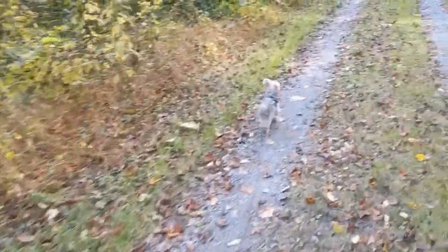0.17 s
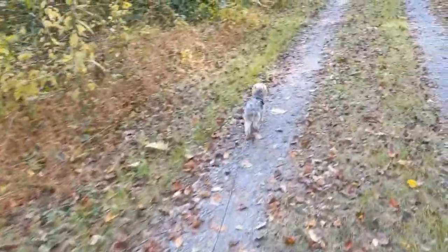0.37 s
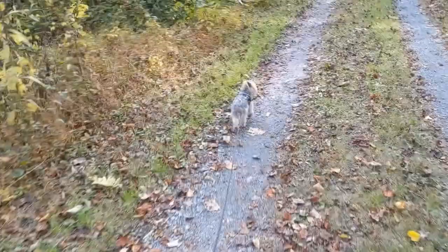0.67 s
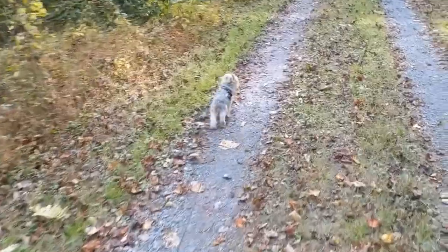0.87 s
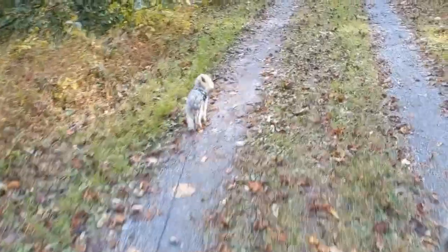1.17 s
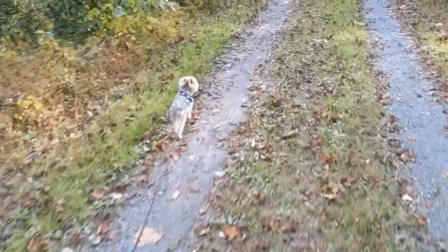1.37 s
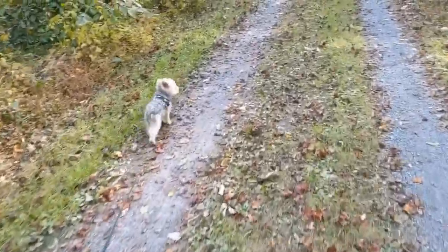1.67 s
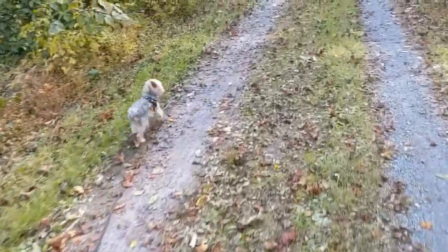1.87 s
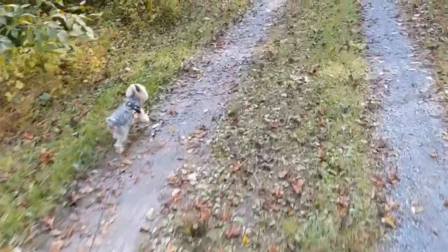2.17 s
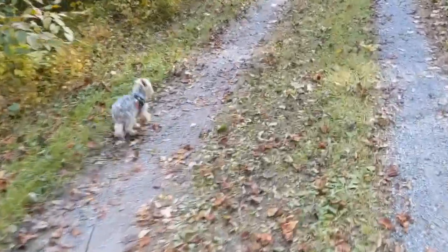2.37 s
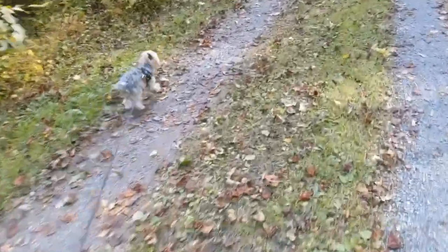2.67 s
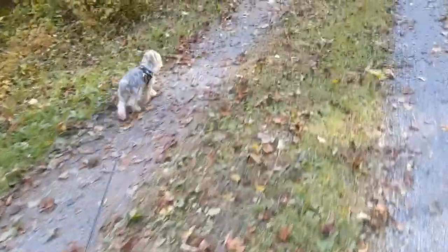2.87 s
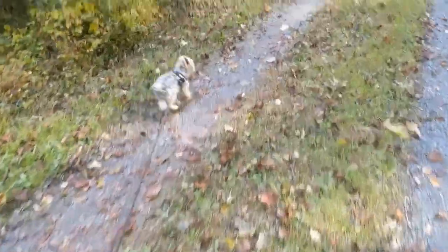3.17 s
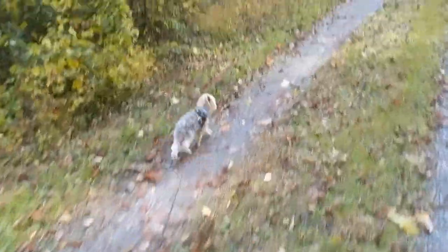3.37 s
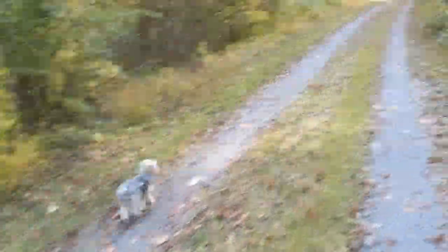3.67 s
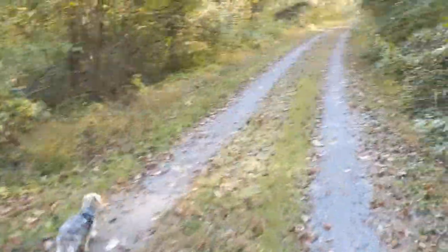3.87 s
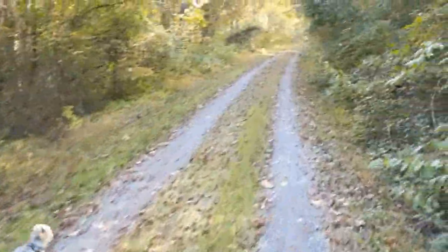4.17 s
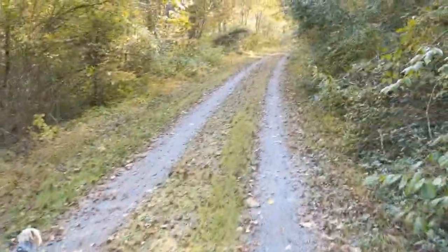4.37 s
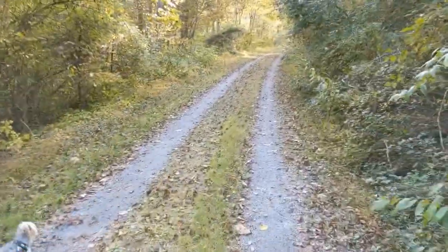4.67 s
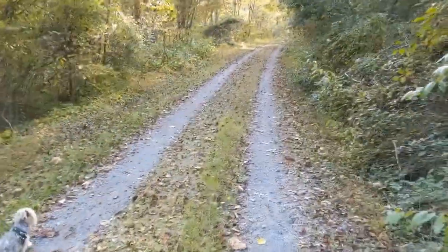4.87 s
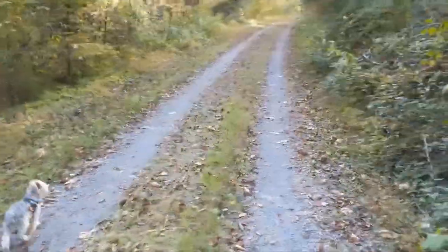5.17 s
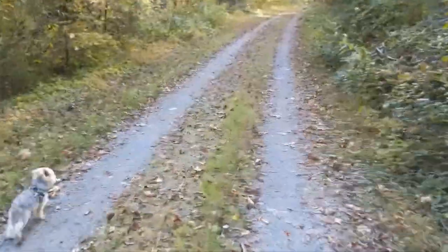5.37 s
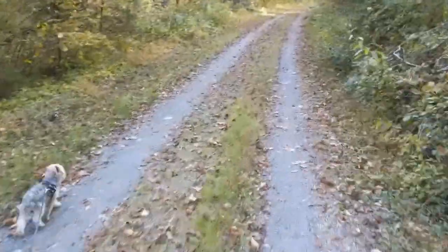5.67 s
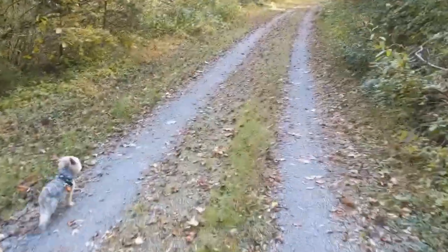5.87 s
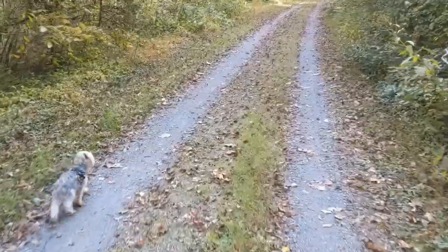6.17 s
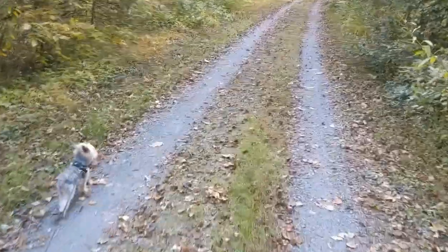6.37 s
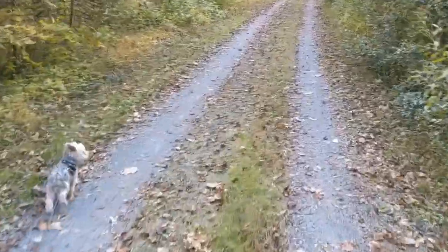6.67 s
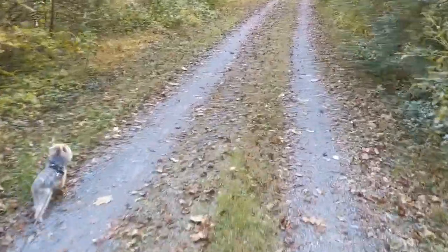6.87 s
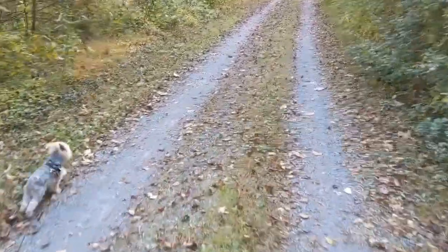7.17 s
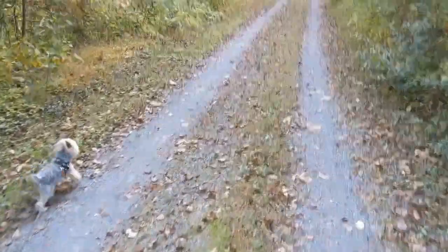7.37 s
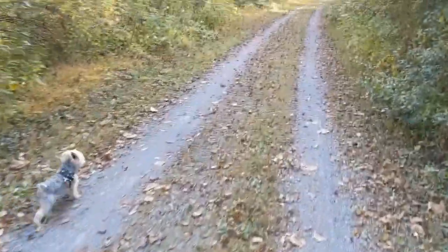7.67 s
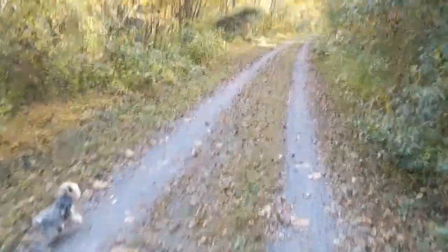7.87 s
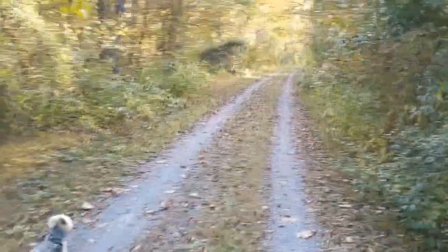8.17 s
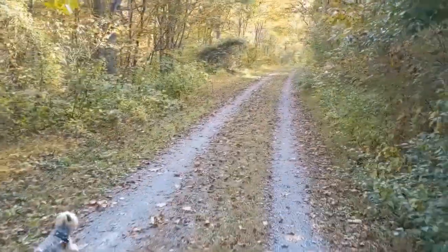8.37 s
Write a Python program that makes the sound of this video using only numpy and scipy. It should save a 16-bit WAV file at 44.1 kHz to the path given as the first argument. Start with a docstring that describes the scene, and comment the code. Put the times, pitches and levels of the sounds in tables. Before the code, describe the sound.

Bicycle tyres roll slowly through dry leaves, hissing and crackling, then crunch over gritty gravel with popping pebbles before rustling through a deeper leaf drift.

```python
"""Woodland gravel track, from a slowly rolling bicycle; stereo microphone, the tyres close by and to the left.
First thin dry leaves hiss in swishes, shaped bursts of crackling noise, with bright ticks as stalks snap.
From about 2.7 s grit crunches as noise in coarser bursts, small stones tick and single pebbles pop from the rubber.
From about 5.7 s a deeper drift of leaves hisses, and towards the end more pebbles pop, some with a bright tip.
Throughout, noise bands make the tyres' drone, the faint hub whine and air on the microphone; bumps thud."""
import sys
import numpy as np
from scipy import signal
from scipy.fft import rfft, irfft, next_fast_len
from scipy.io import wavfile
from scipy.ndimage import uniform_filter1d, map_coordinates

SR = 44100
rng = np.random.default_rng(int(sys.argv[2]) if len(sys.argv) > 2 else 0)


def to_wav(s):
    """Save 16-bit WAV."""
    ch = np.atleast_2d(s).T  # columns
    pcm = np.round(np.clip(ch, -1, 1) * 32767)  # PCM
    wavfile.write(sys.argv[1], SR, pcm.astype(np.int16))


N = 376305


def amp(db):
    """Decibels to gain."""
    return 10 ** (np.asarray(db) / 20)


def unit(pair):
    """Scale a stereo pair so that its centre has rms 1."""
    centre = pair.mean(0)
    return pair / np.sqrt(np.mean(centre ** 2) + 1e-20)


def along(points, hz):
    """Read (Hz, value) points on a logarithmic frequency axis."""
    f, values = np.transpose(points)
    return np.interp(np.log(hz + 1), np.log(f + 1), values)


def curves(rows):
    """One value per sample for each column after the time."""
    times, *columns = np.transpose(rows)
    t = np.arange(N) / SR
    return [np.interp(t, times, column) for column in columns]


def wobble(rate):
    """A smooth random curve with rate knots a second."""
    knots = rng.standard_normal(int(N * rate / SR) + 4)
    return map_coordinates(knots, [np.arange(N) * rate / SR])


def filtered(x, response):
    """Multiply the spectrum of x by a response of frequency."""
    size = next_fast_len(N + SR // 2)
    hz = np.fft.rfftfreq(size, 1 / SR)
    return irfft(rfft(x, size) * response(hz), size)[..., :N]


def resonant(modes, hz):
    """Gain of a few resonant humps, their decibels added."""
    return amp(sum(db / (1 + (2 * (hz - centre) / width) ** 2) for centre, width, db in modes))


def sides(balance, hz):
    """Left and right gains whose mean is 1."""
    ratio = amp(along(balance, hz))
    return 2 * np.array([ratio, np.ones_like(ratio)]) / (1 + ratio)


def add(track, s, sound):
    """Mix a sound into a track at s seconds."""
    start = max(round(s * SR), 0)
    room = track[..., start:start + sound.shape[-1]]
    room += sound[..., :room.shape[-1]]


# likeness of the two microphone channels: f/Hz, likeness (0 unrelated, 1 the same)
LIKENESS = [(30, 0.91), (130, 0.7), (500, 0.37), (1200, 0.48), (2500, 0.075), (5000, 0.028), (12000, 0.1)]


def placed(pair, spectrum, balance):
    """Colour two unrelated signals and blend them into left and right, at rms 1."""
    def mid_side(hz):
        turn = np.arccos(np.clip(along(LIKENESS, hz), -1, 1)) / 2
        return amp(along(spectrum, hz)) * np.array([np.cos(turn), np.sin(turn)])

    mid, side = filtered(pair, mid_side)
    left_right = np.array([mid + side, mid - side])
    return unit(filtered(left_right, lambda hz: sides(balance, hz)))


def patchy(pair, depth_db):
    """Each leaf or patch of ground has its own colour: random gains over some 400 Hz and 40 ms."""
    z = signal.stft(pair, nperseg=512)[2]
    field = rng.standard_normal(z.shape[1:])
    field = uniform_filter1d(field, size=5, axis=0)
    field = uniform_filter1d(field, size=7, axis=1)
    coloured = z * amp(depth_db * field / field.std())
    return unit(signal.istft(coloured, nperseg=512)[1][:, :N])


def fractures(rate, spread_db, life):
    """Energy, of mean 1, of short bursts of scattered size that start at once and die away."""
    chance, size = rng.random(N), rng.standard_normal(N)
    energy = (chance < rate / SR) * amp(spread_db * np.minimum(size, 1.8)) ** 2
    energy = signal.lfilter([1], [1, -np.exp(-2 / (life * SR))], energy)
    return energy / energy.mean()


def crackle(rate, spread_db, life, smooth_db):
    """Two noises made of tiny fractures over a smooth rub."""
    envelope = np.sqrt(fractures(rate, spread_db, life) + amp(smooth_db) ** 2)
    return envelope * rng.standard_normal((2, N))


def narrow(hz, width_hz):
    """A narrow band of noise around a pitch: a carrier with randomly fluttering strength and phase."""
    flutter = wobble(width_hz) + 1j * wobble(width_hz)
    phase = 2 * np.pi * np.cumsum(hz * np.ones(N)) / SR
    return np.real(flutter * np.exp(1j * phase))


def pop(t, hz, cycles):
    """A pitched pulse, as of a stone squeezed out by soft rubber: a quick swell that dies in a few cycles."""
    turns = t * hz
    swell = turns / (np.maximum(cycles, .5) / 2)  # reaches 1 at the loudest moment
    return swell ** 2 * np.exp(2 * (1 - swell)) * np.sin(2 * np.pi * turns)


# headwind at the microphone: t/s, level/dB before trim
WIND = [(0.0, -60.5), (0.4, -63.5), (0.97, -61.5), (1.31, -56), (1.95, -60.5), (2.4, -61), (2.8, -56.5),
        (3.47, -62.5), (4.06, -56), (4.49, -64.5), (6.06, -57), (6.6, -60.5), (6.96, -58), (7.93, -60.5),
        (8.1, -64), (8.53, -62)]
# colour of the buffeting: f/Hz, relative level/dB
BUFFET = [(7.1, -30), (12, 7), (30, -0.5), (76, -10.5), (160, -17), (210, -76), (350, -120)]
# stereo balance of track and bicycle: f/Hz, left minus right level/dB
TRACK_SIDE = [(50, 3.3), (300, 2.6), (1000, 5.3), (2200, 11.1), (3200, 9.1), (4500, 2.6), (8000, 6.2)]
WIND_TRIM_DB = 5


def air():
    """The headwind buffets the microphone in soft lumps: low noise with a wavering level."""
    wind_db, = curves(WIND)
    buffet = placed(rng.standard_normal((2, N)), BUFFET, TRACK_SIDE)
    return amp(wind_db + WIND_TRIM_DB + 2.0 * wobble(9)) * buffet


# hub whine, following the riding speed: t/s, pitch f/Hz, level/dB before trim
HUB = [(0, 4050, -64), (1.5, 4080, -69), (1.75, 4090, -60), (2.0, 4060, -66), (2.7, 4030, -63),
       (3.3, 4200, -68), (3.8, 4140, -70), (4.0, 4100, -60.5), (4.4, 4020, -73), (4.9, 4230, -77),
       (5.3, 4190, -65), (5.7, 4500, -67), (6.4, 4160, -67), (6.9, 4060, -64), (7.3, 4200, -67),
       (7.6, 4260, -62), (8.0, 4040, -67), (8.53, 3970, -78)]
HUB_TRIM_DB, HUB_WAVER_DB = 1.5, 2


def hub():
    """A thin, hissy whine from the turning hub, a narrow noise band coming and going."""
    hz, db = curves(HUB)
    level = amp(db + HUB_TRIM_DB + HUB_WAVER_DB * wobble(14))
    return level * narrow(hz, width_hz=240) * sides(TRACK_SIDE, hz)


# tyre drone: t/s, level/dB before trim
ROLL = [(0.0, -67.5), (0.38, -63.5), (0.57, -72), (0.81, -63), (0.95, -66.5), (1.92, -64), (2.63, -62.5),
        (2.78, -62), (4.11, -61.5), (4.92, -59.5), (5.3, -62.5), (6.15, -60.5), (6.56, -61.5), (7.77, -62),
        (8.27, -66), (8.53, -58)]
# colour of the drone: f/Hz, relative level/dB
DRONE = [(40, 3.5), (100, -7), (200, -0.5), (270, 2.5), (380, 1.5), (700, -4), (1500, -9.5), (5000, -27.5)]
# hollow tones of the rolling wheels: f/Hz, width/Hz, gain level/dB
WHEELS = [(251, 44, 6), (467, 17.5, 8.5), (613, 31, 9)]
# bumps: t/s, level/dB before the stereo offset, pitch f/Hz
BUMPS = [(1.091, -46, 163), (1.2, -48, 130), (1.319, -51, 117), (2.989, -46.5, 132), (3.77, -45, 87.5),
         (3.79, -47.5, 187), (4.66, -38.5, 290), (4.757, -38, 122), (6.208, -44, 166), (6.3, -42, 460),
         (6.378, -39.5, 142), (7.943, -39, 506), (7.965, -40.5, 297)]
ROLL_TRIM_DB = 2.1
SCUFF_DB, SCUFF_T60_S = -12.5, 0.2  # drone added after a bump: level against its thud, decay


def rolling():
    """The tyres drone through the wheels' hollow tones; each bump thuds and briefly swells the drone."""
    drone_db, = curves(ROLL)
    drone = placed(rng.standard_normal((2, N)), DRONE, TRACK_SIDE)
    drone = patchy(drone, depth_db=2.5)
    drone = unit(filtered(drone, lambda hz: resonant(WHEELS, hz)))
    uneven_db = 1.4 * wobble(18)
    thuds, scuffs = np.zeros(N), np.zeros(N)
    t = np.arange(SR // 5) / SR
    for s, db, hz in BUMPS:
        add(thuds, s, amp(db) * pop(t, hz, cycles=1.85))
        add(scuffs, s, amp(db + SCUFF_DB - 60 * t / SCUFF_T60_S))
    level = np.hypot(amp(drone_db + ROLL_TRIM_DB + uneven_db), scuffs)
    return level * drone + thuds * amp([[1.5], [-1.5]])  # thuds lean left


# band in which a stone under the tyre radiates: f/Hz, relative level/dB
STONE_BAND = [(200, 1.5), (520, -5), (900, 4), (1350, -3), (2400, 1), (3450, 2.5), (4000, -7), (4800, -7),
              (5700, 3), (8000, -20)]


def stone_sound(hz):
    """Left and right response to a stone popping under the tyre."""
    return amp(along(STONE_BAND, hz)) * sides(TRACK_SIDE, hz)


def small_stones(rate, spread_db, pitch_hz, scatter, cycles, clump):
    """Little pops come in clusters, each with its own pitch and size."""
    t = np.arange(SR // 100) / SR
    density = np.exp(clump * np.minimum(wobble(30), 1))
    starts = np.flatnonzero(rng.random(N) < rate / SR * density / density.mean())
    size, pitch, ring = rng.standard_normal((len(starts), 3)).T[:, :, None]
    hz = pitch_hz * np.exp(scatter * np.clip(pitch, -1.6, 1))
    loudness = amp(spread_db * np.minimum(size, 1))
    grains = loudness * pop(t, hz, cycles * np.exp(0.31 * ring))
    places = starts[:, None] + np.arange(len(t))
    patter = np.bincount(places.ravel(), grains.ravel(), N)[:N]
    return unit(filtered(patter, stone_sound))


# ground under the tread: t/s, grit level/dB before clumping, small stones level/dB before trim
GROUND = [(0, -60, -63.5), (.4, -54, -65), (.75, -56, -73), (1.45, -59, -65), (2.2, -60.5, -64.5),
          (2.75, -51, -49.5), (3.0, -53.5, -60.5), (3.4, -51, -52), (4.2, -52.5, -52), (4.85, -55, -52.5),
          (5.4, -53.5, -54), (5.85, -55, -55), (6.2, -49, -60), (6.45, -56, -57), (6.9, -55.5, -63.5),
          (7.4, -53.5, -50.5), (8.1, -53.5, -54.5), (8.53, -54, -51.5)]
# colour of the grit: f/Hz, relative level/dB
GRIT = [(200, -10), (550, -6.5), (1000, -0.5), (1350, -1), (2300, 1.5), (3300, 1), (4200, -2.5),
        (4800, -10), (7000, -16.5), (16000, -34)]


def gravel():
    """Grit grinds under the tread and small stones tick in it, each with its own changing level."""
    grit_db, stones_db = curves(GROUND)
    grit = placed(crackle(rate=500, spread_db=3, life=0.0059, smooth_db=-1.5), GRIT, TRACK_SIDE)
    stones = small_stones(rate=130, spread_db=6, pitch_hz=2150, scatter=0.33, cycles=0.92, clump=.6)
    clumps_db = 1.7 * wobble(30)
    grinding = amp(grit_db + clumps_db) * patchy(grit, depth_db=3.5)
    ticking = amp(stones_db - 1.0) * patchy(stones, depth_db=3.0)
    return grinding + ticking


# larger pebbles that pop: t/s, level/dB before trim and stone band, pitch f/Hz, ring/cycles
PEBBLES = [(0.3274, -22, 2620, 1.8), (0.9175, -25.5, 2550, 1.83), (2.285, -30, 1970, 0.59),
           (2.7017, -29.5, 2290, 0.76), (2.7712, -30, 1760, .9), (2.829, -28, 1520, 0.58),
           (3.0331, -24, 1520, 0.83), (3.038, -22.5, 1870, 0.69), (3.0687, -23, 1720, 1.2),
           (3.2825, -27, 1290, 0.68), (3.4146, -16.5, 1650, .85), (3.522, -30, 2640, 2.6),
           (3.5866, -23, 1830, 0.81), (3.7273, -27, 2330, 0.33), (3.7542, -27.5, 1800, 0.59),
           (3.7825, -30, 1680, 0.5), (3.817, -29, 1660, 0.91), (3.845, -35, 2200, 1.1),
           (3.934, -31.5, 2120, 1.1), (3.9203, -34, 1580, 0.8), (4.0687, -28.5, 1500, .7),
           (4.1236, -24, 2450, 0.92), (4.3112, -19, 2500, 1), (4.3462, -23.5, 1860, 0.89),
           (4.4234, -32, 2210, 1.3), (4.527, -14, 1830, .6), (4.5872, -16.5, 1840, 1.07),
           (4.6595, -27, 2300, 1.8), (4.6624, -21, 1860, .8), (4.7532, -28, 2780, 1.9),
           (4.7797, -21.5, 1780, 0.76), (4.8056, -21, 2170, 0.61), (4.8553, -26, 2820, 2),
           (4.8772, -18, 2670, 1.7), (4.891, -26, 2220, 0.93), (4.9084, -28, 2620, 1.2),
           (4.9476, -33, 1840, .95), (5.0712, -30, 2220, 1.06), (5.1334, -26, 2080, .9),
           (5.1988, -28, 2150, 0.82), (5.652, -25.5, 2600, 1.6), (5.7549, -18, 1710, 1.2),
           (6.966, -29, 2000, 2.04), (7.0569, -26.5, 2510, 1.55), (7.0834, -29, 2450, 1.3),
           (7.322, -15, 1520, 0.82), (7.4622, -31, 2210, 1.3), (7.716, -17.5, 2650, 1),
           (7.817, -23, 2200, 1.07), (7.89, -26.5, 2800, 1.5), (8.0178, -14, 2340, 1.4),
           (8.0969, -24.5, 2590, 1.2), (8.2766, -27.5, 1500, .65), (8.4173, -27.5, 2300, 1.4),
           (8.4732, -14, 2020, 1.07), (8.5128, -29, 2680, 1.1)]
STIR_DB, STIR_GROWS = -29.5, 0.61  # grit shifted by a pebble: level for a pop of 0 dB, dB per dB of pop
STIR_T60_S = 0.069  # settling after the pop
LOAD_DB, LOAD_T60_S = -9.5, 0.053  # softer grinding before the pop: relative level, build-up


def pebbles():
    """Each pebble pops once and shifts the grit around it, the more the harder it pops."""
    pops, stirred = np.zeros(N), np.zeros(N)
    t = np.arange(SR // 10) / SR
    for s, db, hz, cycles in PEBBLES:
        swell_s = cycles / hz / 2
        grit_db = STIR_DB + STIR_GROWS * db
        add(pops, s - swell_s, amp(db + 0.53) * pop(t, hz, cycles))
        add(stirred, s, amp(grit_db - 60 * t / STIR_T60_S))
        # the grit grinds as the tread loads the pebble
        add(stirred, s - t[-1], amp(grit_db + LOAD_DB - 60 * t[::-1] / LOAD_T60_S))
    spray = placed(crackle(rate=1500, spread_db=5, life=.001, smooth_db=-3), GRIT, TRACK_SIDE)
    return filtered(pops, stone_sound) + stirred * patchy(spray, depth_db=3)


# leaves rubbing on the tyre: t/s of the middle, length/s, pitch f/Hz, level/dB before stereo balance
SQUEAKS = [(.36, 0.35, 1634, -60), (0.412, 0.056, 3400, -43.5), (0.89, 0.092, 2330, -53),
           (2.0, 1, 1523, -66), (2.148, 0.099, 3730, -54)]
# stereo balance of the leaves, close on the left: f/Hz, left minus right level/dB
LEAF_SIDE = [(1000, 2.5), (3000, 9.5), (4700, 2), (6500, 7), (7600, 10), (9000, 13.5), (11000, 26),
             (14000, 18)]


def squeaks():
    """A leaf caught on the tyre rubs at one rough pitch, swelling and fading with a faint squeak."""
    t, out = np.arange(N) / SR, np.zeros((2, N))
    for s, length, hz, db in SQUEAKS:
        swell = np.exp(-(2 * (t - s) / length) ** 2)
        rub = amp(db) * swell * narrow(hz, width_hz=.12 * hz)
        out += sides(LEAF_SIDE, np.array([hz])) * rub
    return out


# bright ticks, of stalks snapping and the sharp bright tips of some pebble pops:
# t/s, level/dB before the tick and spray trims, pitch f/Hz
BRIGHT_TICKS = [(0.3267, -18.5, 9300), (0.494, -23, 7600), (0.6806, -21.5, 7450), (0.8762, -23, 9700),
                (1.007, -22.5, 9150), (1.1904, -25, 9700), (1.222, -28, 11400), (1.37, -25.5, 9690),
                (1.4113, -28, 7410), (1.57, -30, 9100), (1.62, -20, 9450), (1.6311, -14, 9900),
                (1.7128, -23.5, 10000), (2.0166, -21.5, 11800), (2.2022, -24, 9610), (3.5856, -31.5, 6130),
                (4.2227, -30, 5860), (4.312, -31.5, 5700), (4.877, -40, 12500), (5.241, -33.5, 9500),
                (5.3797, -30, 9430), (5.6515, -22.5, 9800), (6.317, -26, 5460), (6.964, -26, 9400),
                (7.0868, -21.5, 11800), (7.4592, -28.5, 5470), (7.721, -25, 9300), (8.2761, -28.5, 5500),
                (8.4716, -29, 5660)]
# colour of thin leaves, also of the spray after a bright tick: f/Hz, relative level/dB
THIN_LEAVES = [(300, -29), (1100, -12.5), (1900, -9), (3200, 0), (4700, -3.5), (7000, -2.5), (10000, 0),
               (11500, -2), (13000, -5), (16000, -5.5)]


def bright_ticks():
    """Stalks snapping, and the sharp bright tips of some pebble pops: a pitched tick and a brief spray of noise."""
    ticks, spray = np.zeros(N), np.zeros(N)
    t = np.arange(SR // 20) / SR
    for s, db, hz in BRIGHT_TICKS:
        add(ticks, s, amp(db - 5) * pop(t, hz, cycles=1.4))
        add(spray, s, amp(db - 12.5 - 60 * t / .022))  # falls 60 dB in 22 ms
    spray = spray * placed(rng.standard_normal((2, N)), THIN_LEAVES, LEAF_SIDE)
    return filtered(ticks, lambda hz: sides(LEAF_SIDE, hz)) + spray


# heaps of leaves crushed under a tyre: t/s of the peak, peak level/dB, length/s
SWISHES = [(0.122, -42, 0.097), (0.241, -40.5, 0.1), (0.317, -38, .07), (0.374, -37.5, 0.21),
           (0.515, -40, 0.076), (0.652, -42.5, 0.13), (0.893, -40, 0.096), (1.007, -40.5, 0.081),
           (1.12, -43, 0.11), (1.231, -42, 0.038), (1.275, -44.5, 0.065), (1.378, -45, 0.059),
           (1.578, -36.5, 0.061), (1.634, -38, 0.093), (1.721, -40, 0.043), (1.936, -43, 0.12),
           (2.037, -35, 0.037), (2.12, -41.5, 0.048), (2.294, -47.5, 0.19), (2.486, -39.5, 0.078),
           (2.627, -44, .05), (2.825, -45, 0.069), (2.965, -46.5, 0.06), (3.16, -51, 0.089),
           (3.303, -50.5, 0.094), (5.663, -47, 0.027), (5.974, -42.5, 0.14), (6.09, -37.5, 0.1),
           (6.216, -38, 0.16), (6.266, -35, .1), (6.324, -38.5, 0.053), (6.456, -45, 0.048),
           (6.54, -42, 0.24), (6.694, -36, 0.091), (6.81, -41.5, 0.2), (6.984, -47, .06),
           (7.11, -36, 0.082), (7.172, -47, 0.23), (7.358, -42, 0.068), (7.724, -48, 0.031),
           (7.98, -47, 0.045), (8.366, -53.5, 0.082)]
SWISH_EDGE_DB, SWISH_RISE = -11.5, 0.47  # level at both ends of a swish; share of its length spent rising


def swishes():
    """Each heap of leaves swells as the tyre climbs it and dies away behind; their power adds up."""
    t, power = np.arange(N) / SR, np.zeros(N)
    for s, db, length in SWISHES:
        near = np.abs(t - s) < 2 * length
        u = (t[near] - s) / length
        away = np.maximum(-u / SWISH_RISE, u / (1 - SWISH_RISE))  # 0 at the peak, 1 at either end
        power[near] += amp(db + SWISH_EDGE_DB * away) ** 2
    return power


# leaf litter that the tyres rustle through all the time: t/s, level/dB before trim
LITTER = [(0.0, -47.5), (0.16, -68), (0.35, -45.5), (0.73, -50), (2.21, -49.5), (3.23, -59), (4.25, -55),
          (4.47, -61), (5.75, -55.5), (5.94, -50.5), (6.1, -65), (6.77, -52), (7.58, -54.5), (8.53, -54.5)]
# drift of leaves under the tyres: t/s, depth (0 thin, 1 deep)
DEPTH = [(3, 0.031), (5.8, 0.97)]
# colour of the deep leaves: f/Hz, relative level/dB
DEEP_LEAVES = [(300, -20.5), (1100, -5), (1900, -5), (3200, 3), (4700, 0.5), (6000, 2.5), (8000, -3.5),
               (11500, -0.5), (13000, -0.5), (16000, -3)]
LITTER_TRIM_DB = -2.1


def leaves():
    """Crushed leaves hiss in swishes over rustling litter; the second drift is deeper and rustles a little lower."""
    litter_db, = curves(LITTER)
    litter = amp(litter_db + LITTER_TRIM_DB + 1.74 * wobble(23))
    hiss = np.sqrt(litter ** 2 + swishes())
    depth = np.clip(curves(DEPTH)[0], 0, 1)
    thin = placed(crackle(rate=700, spread_db=4, life=0.00082, smooth_db=2.5), THIN_LEAVES, LEAF_SIDE)
    deep = placed(crackle(rate=1800, spread_db=10, life=.0013, smooth_db=4), DEEP_LEAVES, LEAF_SIDE)
    rustle = amp(-0.4) * np.sqrt(1 - depth) * thin + np.sqrt(depth) * deep
    # whole leaves cave in
    collapse = np.sqrt(1 + amp(-8.0) * fractures(rate=70, spread_db=2.5, life=0.01))
    return hiss * patchy(collapse * rustle, depth_db=2.0)


def scene():
    """Everything under and around the bicycle, in open air."""
    return air() + hub() + rolling() + gravel() + pebbles() + squeaks() + bright_ticks() + leaves()


# resonances of the left microphone's opening: f/Hz, width/Hz, gain level/dB
PORT = [(5640, 720, 6), (7490, 630, 5), (9560, 830, 4.5), (11650, 190, 7)]
# phase by which the left microphone leads: f/Hz, lead/radians
LEAD = [(30, -.5), (130, -1.5), (270, -1.2), (520, -.9), (1000, 0), (1700, 0), (2500, -.7), (4000, -.8)]
TOP_HZ = 15950


def record(dry):
    """The two openings differ in phase, the left colours the treble; nothing is kept above the band limit."""
    def microphones(hz):
        left = resonant(PORT, hz) * np.exp(1j * along(LEAD, hz))
        return np.array([left, np.ones_like(hz)]) * (hz < TOP_HZ)

    return filtered(dry, microphones)


dry = scene()
out = record(dry)
to_wav(out)
```